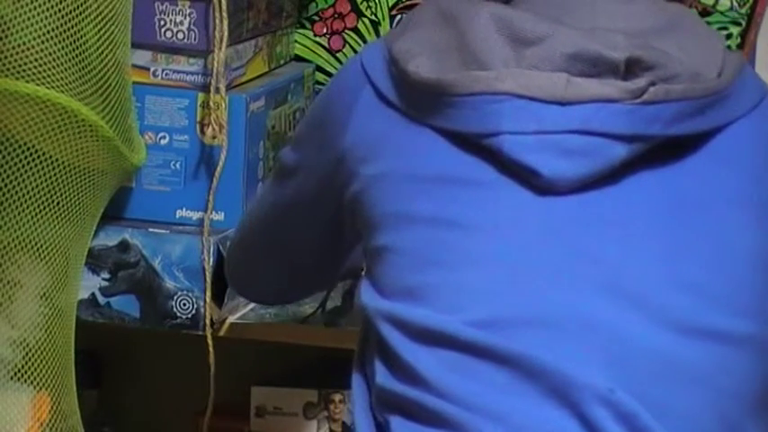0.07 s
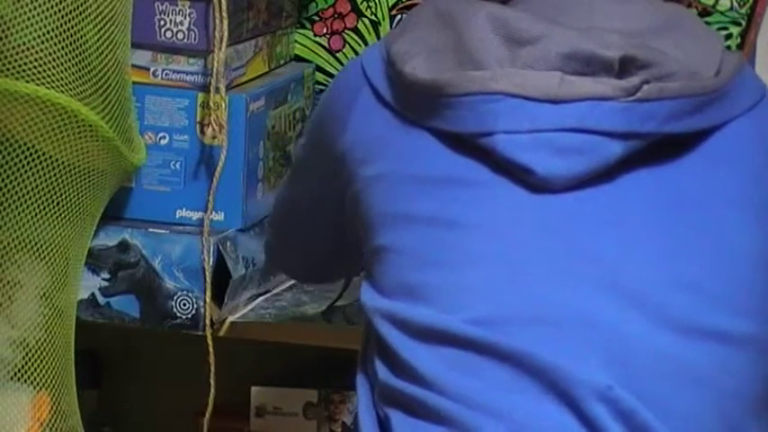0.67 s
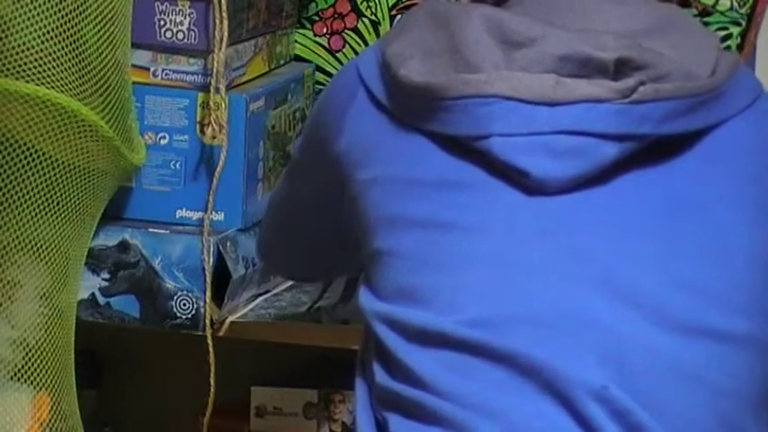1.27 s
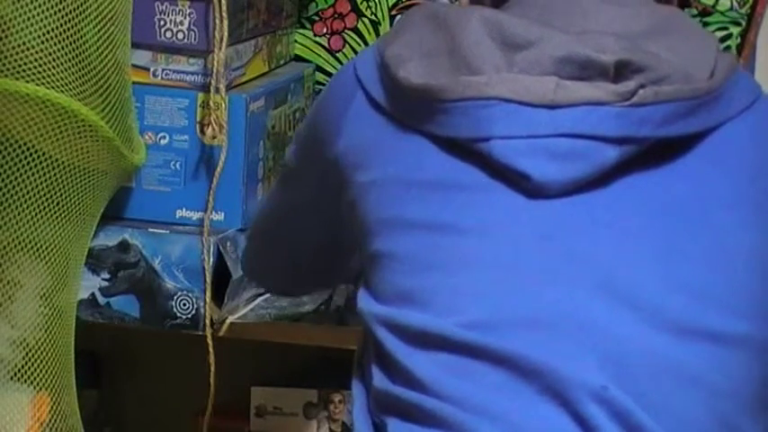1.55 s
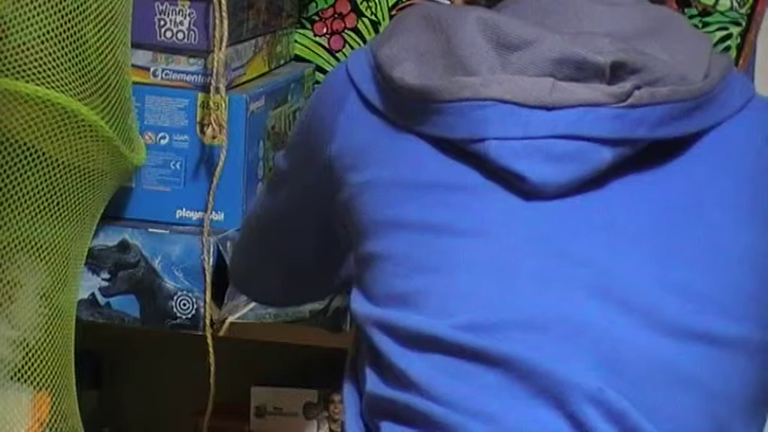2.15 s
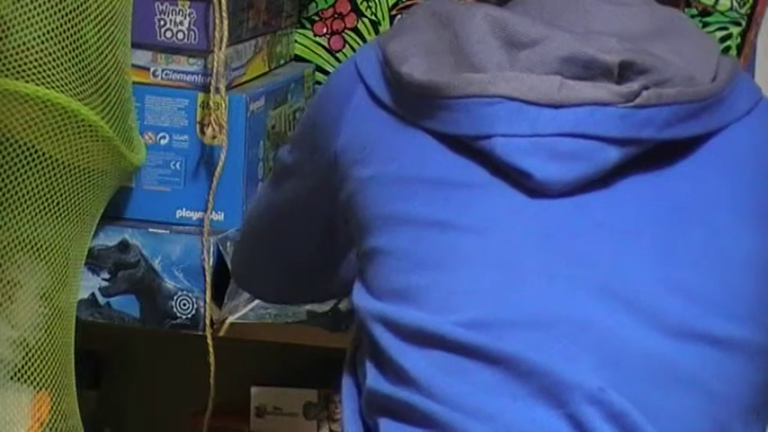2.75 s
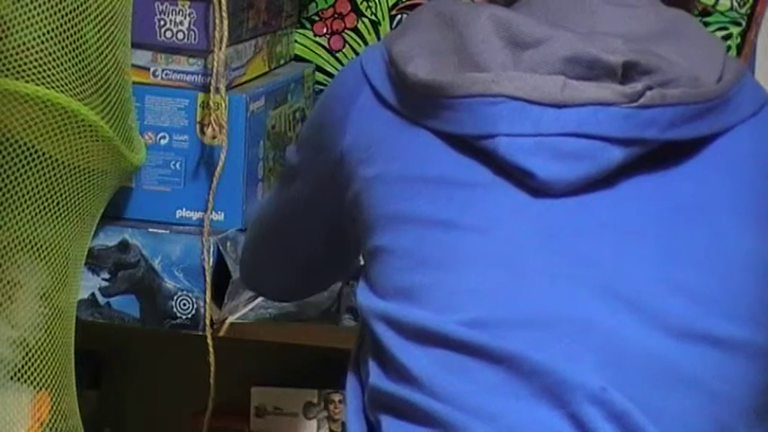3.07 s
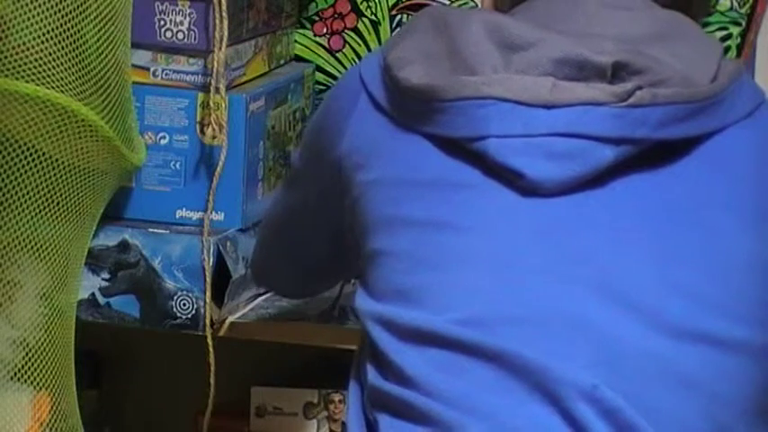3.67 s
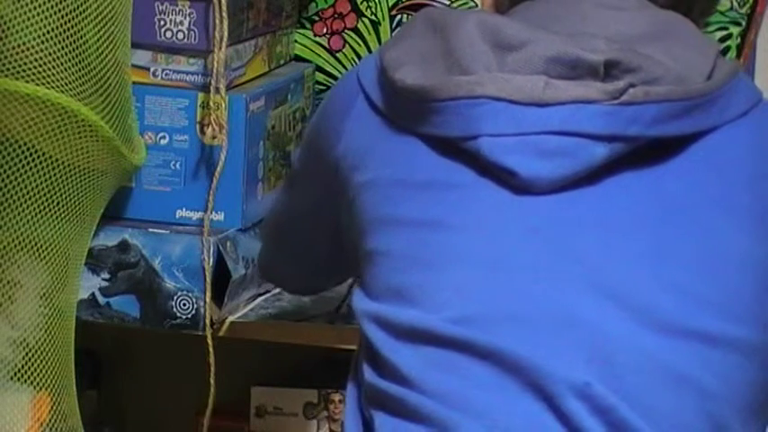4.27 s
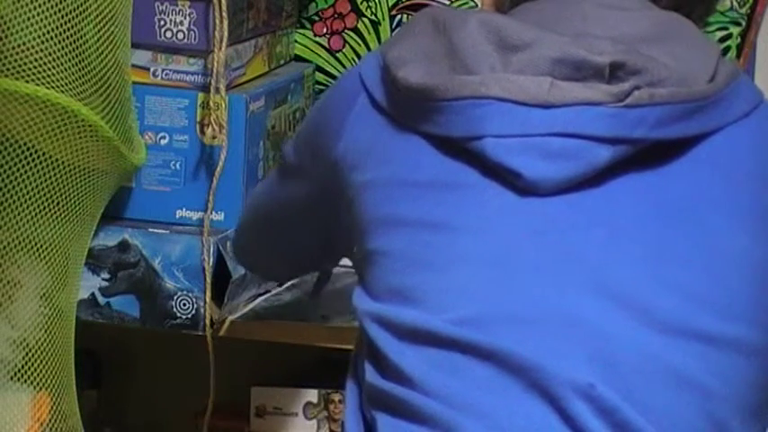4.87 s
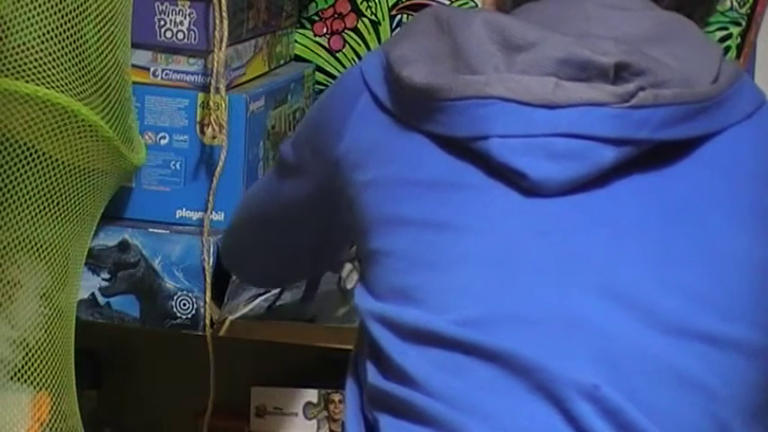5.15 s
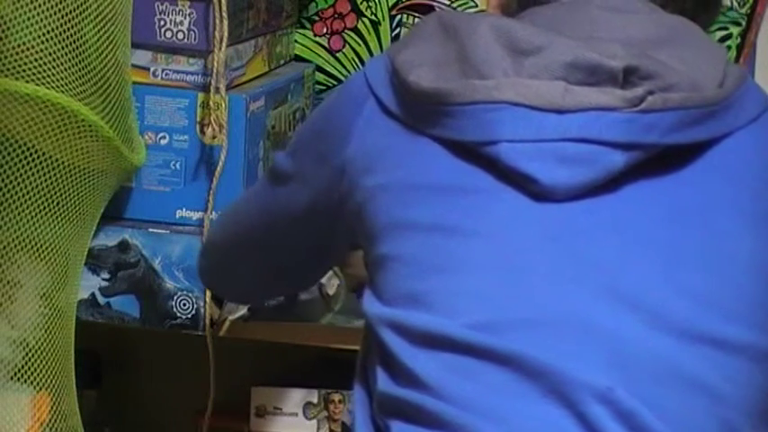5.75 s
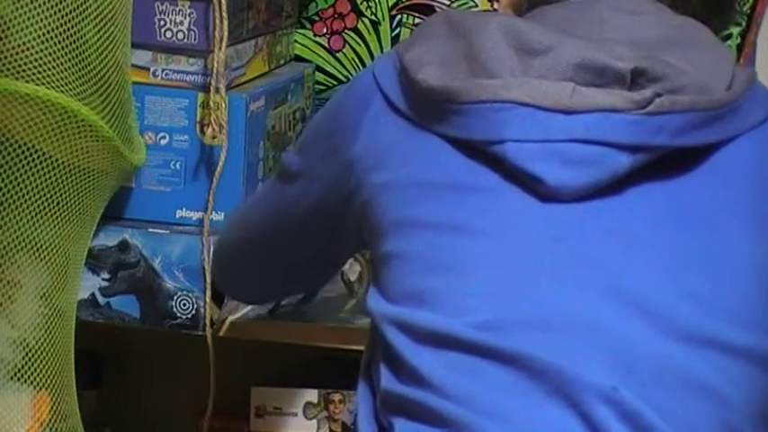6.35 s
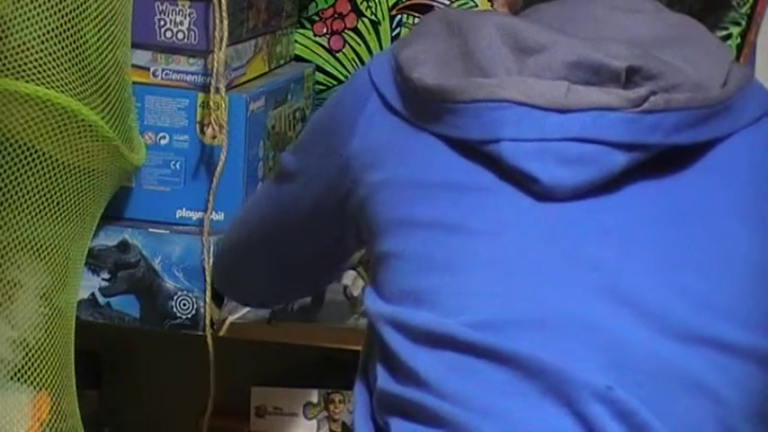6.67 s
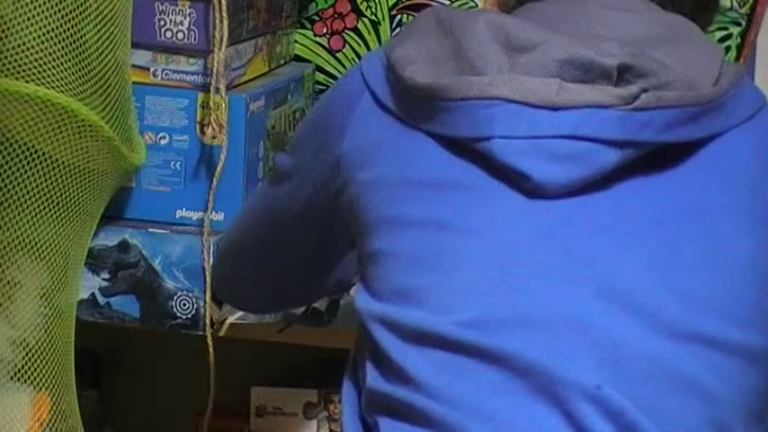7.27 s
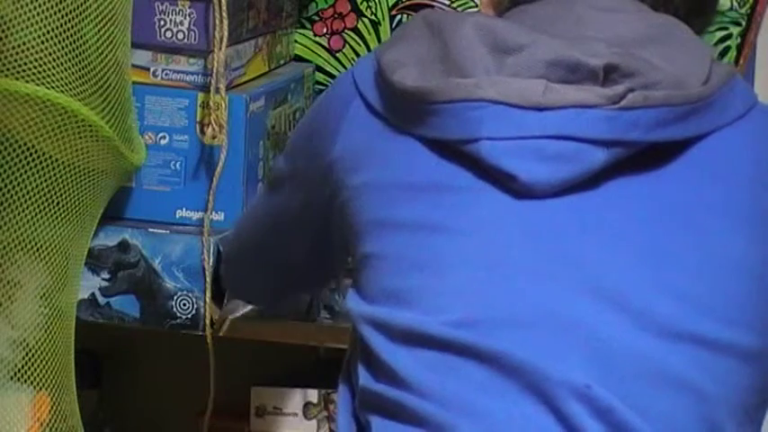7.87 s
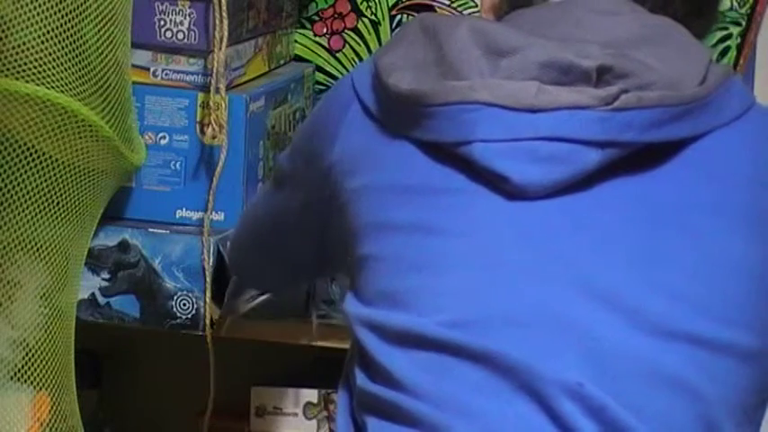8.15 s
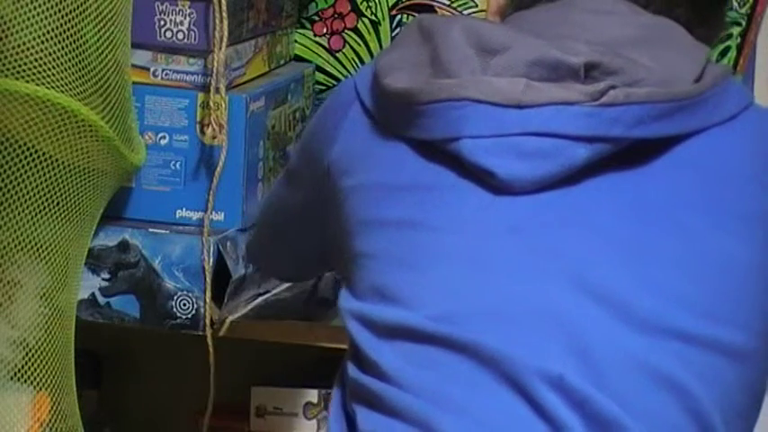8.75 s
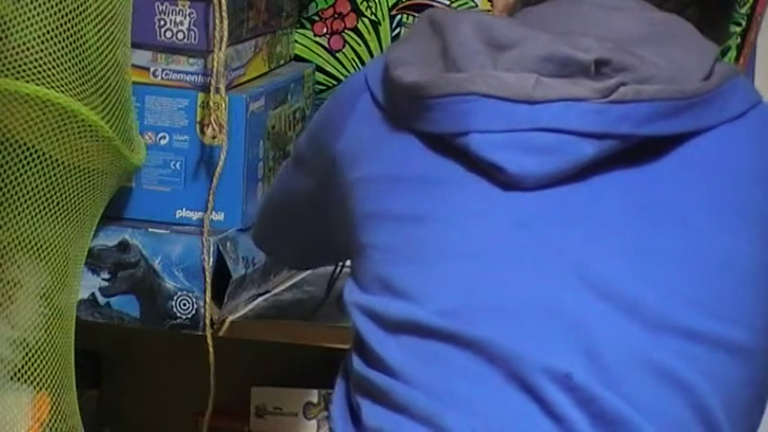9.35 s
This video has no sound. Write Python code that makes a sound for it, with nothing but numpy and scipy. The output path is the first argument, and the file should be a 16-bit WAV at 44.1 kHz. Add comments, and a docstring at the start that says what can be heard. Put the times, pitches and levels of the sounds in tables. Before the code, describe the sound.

Someone rearranges small hard shells on a wooden board, each touch giving a brief ringing click. Sparse, delicate taps build to a short clatter with scraping, thin out, then return as a few bright clacks and hollow knocks near the end. The small room adds a short echo. Cloth rustles softly and a clock ticks faintly over a quiet appliance hum and microphone hiss.

```python
"""In a small, bare-sounding room, seashells are picked up and set down on a wooden shelf.
Each touch makes a shell click and ring at its own pitches. The shells also clack together,
knock on the board and scrape as they slide. Behind them an appliance hums, a clock ticks
faintly once a second and a sleeve rustles as the arm reaches."""
import sys
import numpy as np
from scipy import signal
from scipy.fft import rfft, irfft, next_fast_len
from scipy.io import wavfile
from scipy.ndimage import uniform_filter1d, map_coordinates

SR = 44100
rng = np.random.default_rng(int(sys.argv[2]) if len(sys.argv) > 2 else 0)


def unload_audio(sound):
    """Save the sound as a 16-bit wav file, at the path given as the first command line argument."""
    columns = np.transpose(np.atleast_2d(sound))
    # keep every value between -1 and 1, then stretch to whole-number steps
    steps = np.round(np.clip(columns, -1, 1) * 32767)
    wavfile.write(sys.argv[1], SR, steps.astype(np.int16))


N = 423801
TIME = np.arange(N) / SR
FFT_SIZE = 2 ** 13
HZ = np.fft.rfftfreq(FFT_SIZE, 1 / SR)


def amp(db):
    """Turn decibels into a gain to multiply by."""
    return 10 ** (np.asarray(db) / 20)


def unit(x):
    """Scale a sound to an average power of 1."""
    return x / np.sqrt(np.mean(x ** 2) + 1e-20)


def along(points, hz):
    """Read between (frequency [Hz], value) points on a log frequency scale."""
    freqs, values = np.transpose(points)
    return np.interp(np.log(hz + 1), np.log(freqs + 1), values)


def resonances(modes, hz):
    """Gain of an object that rings at (pitch [Hz], width [Hz], level [dB]); narrow rings last longer."""
    return np.sqrt(sum((amp(db) * hz * width) ** 2 / ((pitch ** 2 - hz ** 2) ** 2 + (hz * width) ** 2)
                       for pitch, width, db in modes))


def filtered(x, gain):
    """Turn each frequency of x up or down by gain(hz)."""
    n = x.shape[-1]
    padded = next_fast_len(n + 8192)
    return irfft(rfft(x, padded) * gain(np.fft.rfftfreq(padded, 1 / SR)), padded)[..., :n]


def impulse(gain):
    """The sound of one instant tap on an object with this gain at each frequency in HZ."""
    cepstrum = irfft(np.log(np.maximum(gain, gain.max() * 1e-6)))
    cepstrum[1:FFT_SIZE // 2] *= 2  # folding this in half puts the energy as early as possible
    cepstrum[FFT_SIZE // 2 + 1:] = 0
    return irfft(np.exp(rfft(cepstrum)))[:FFT_SIZE // 2]


def add(out, time, sound):
    """Mix a sound into out, starting at a time in seconds."""
    start = max(round(time * SR), 0)
    out[:, start:start + sound.shape[1]] += sound[:, :N - start]


# how wide the sound is: (frequency [Hz], side level over middle [dB])
STEREO_WIDTH = [(60, 0), (130, -22), (250, -19), (500, -12.5), (2000, -13), (4000, -9), (8000, -3.5),
                (14000, -1.5)]
def diffuse(n):
    """Stereo noise arriving from all around."""
    mid, side = rng.standard_normal((2, n))
    side = filtered(side, lambda hz: amp(along(STEREO_WIDTH, hz)))
    return np.array([mid + side, mid - side])


def noise(colour):
    """Steady noise of power 1, shaped by (frequency [Hz], level [dB]) points."""
    return unit(filtered(diffuse(N), lambda hz: amp(along(colour, hz))))


# how long the room echoes: (frequency [Hz], time to fade by 60 dB [s])
ROOM_FADE = [(150, 0.21), (400, 0.41), (1000, 0.24), (3000, 0.26), (8000, 0.25), (14000, 0.18)]
# the shelf's walls and the floor bunch the first echoes: (delay [s], boost [dB])
EARLY_ECHOES = [(0, -3), (.0012, 2), (.003, -2.5), (.0047, 3.5), (.007, -0.5), (.0105, -2), (.014, 0),
                (.03, 0.5)]
def in_room(sound, direct=0.11):
    """A sound arrives weakly by the straight path, then as a fresh random set of fading echoes."""
    hz, t, spectrum = signal.stft(diffuse(SR // 3), SR, nperseg=256)
    fade = amp(-60 * t / along(ROOM_FADE, hz)[:, None])
    tail = signal.istft(spectrum * fade, SR, nperseg=256)[1]
    tail *= amp(np.interp(TIME[:tail.shape[1]], *np.transpose(EARLY_ECHOES)))
    path = tail / np.linalg.norm(tail.mean(axis=0))
    path[:, 0] += direct
    return signal.fftconvolve(path, sound[None], axes=1)


# tone of the room's noise: (frequency [Hz], relative level [dB])
AIR_COLOUR = [(25, -24), (40, -6.5), (55, -1), (85, -1.5), (150, -8.5), (195, -5), (255, -22), (305, -3),
              (350, -27), (570, -4.5), (800, -13), (2700, -13.5), (6000, -22.5), (15600, -37.5)]
def room_air(level_db=-62):
    """The room's faint, steady rush."""
    return amp(level_db) * noise(AIR_COLOUR)


# the appliance's tones: (pitch [Hz], width of the wander [Hz], level [dB])
HUM_TONES = [(59.5, 7.2, -77.5), (199, 1.98, -65.5), (564, 6.5, -78.5), (2166, 31.3, -72.5),
             (2270, 11, -92)]
def appliance(drone_hz=64.6, drone_db=-64.5, drone_start_s=7.45, drone_rise_s=0.91):
    """An appliance hums in slightly wandering tones; a low drone joins near the end."""
    def tone(hz, width):
        drift = np.cumsum(rng.standard_normal(N)) * np.sqrt(np.pi * width / SR)
        return np.sqrt(2) * np.sin(2 * np.pi * hz * TIME + uniform_filter1d(drift, size=600))
    hum = sum(amp(db) * tone(hz, width) for hz, width, db in HUM_TONES)
    fade_in = np.clip((TIME - drone_start_s) / drone_rise_s, 0, 1)
    return hum + amp(drone_db) * fade_in * tone(drone_hz, 0.8)


def clock(tick_db=-25, period_s=.998, rebound_s=.018, rebound_db=-3):
    """The clock's hand steps and settles, sounding its hollow case."""
    out = np.zeros((2, N))
    case = impulse(resonances([(848, 184, -10), (1890, 1450, -17)], HZ) ** 2)
    case = amp(tick_db) * case / np.linalg.norm(case)
    for time in np.arange(.184, 9.5, period_s):
        tick = in_room(case)
        add(out, time, tick)
        add(out, time + rebound_s, amp(rebound_db) * tick)
    return out


# tone of rubbing cloth: (frequency [Hz], relative level [dB])
CLOTH_COLOUR = [(100, -37), (200, 3), (400, 8), (800, 3), (2000, 1), (4000, -13), (9000, -11.5),
                (12000, -20.5), (15000, -59)]
# the arm reaches out: (middle time [s], length [s], rise [dB])
ARM_REACHES = [(0.047, 1.1, 7), (.85, 0.93, 7.5), (2.8, 2.2, 3), (4.802, 2, 4.5), (6.038, 0.3, 6),
               (6.902, 0.95, 4), (8.702, 2.1, 4)]
def sleeve(resting_db=-66, flutter_db=1, flutter_hz=22):
    """Cloth rubs unevenly, swelling and sinking with each reach of the arm."""
    flutter = map_coordinates(rng.standard_normal(1000), [TIME * flutter_hz], order=1, mode="wrap")
    swell_db = sum(db * np.cos(np.pi * np.clip((TIME - middle) / length, -.5, .5)) ** 2
                   for middle, length, db in ARM_REACHES)
    return amp(resting_db + swell_db + flutter_db * flutter) * noise(CLOTH_COLOUR)


# tone of the wood: (frequency [Hz], relative level [dB])
BOARD_COLOUR = [(30, -44), (100, -6), (135, -11), (175, -2), (240, -5.5), (320, -2.5), (430, -3.5),
                (480, -10), (570, -1.5), (850, 0.5), (2400, -5), (2900, -12), (8000, -40), (12000, -47.5),
                (15000, -75)]
# where the wood rings: (pitch [Hz], width [Hz], relative level [dB])
BOARD_RINGS = [(203, 12.5, 12.5), (559.6, 10, 3.5), (823, 40, 5), (904, 15, 7.5), (960, 12, -6),
               (1218, 63, 5), (1545.5, 27, 12.5), (1990, 90, 0.5), (2470, 61, 6)]
def board():
    """Gain of the shelf board: a broad wooden knock with a few ringing pitches on top."""
    return amp(along(BOARD_COLOUR, HZ)) * np.hypot(1, resonances(BOARD_RINGS, HZ))


# tone of a hard contact: (frequency [Hz], relative level [dB])
CLICK_COLOUR = [(60, -20), (130, -22), (195, 4.5), (240, -9), (340, -4.5), (480, -6.5), (600, 3.5),
                (2500, 12), (5500, 7.5), (8500, 9), (10500, 2.5), (12500, -7), (14000, -24), (16000, -42)]
def click(ring=0):
    """Gain of a hard contact, with any ringing laid on top."""
    return amp(along(CLICK_COLOUR, HZ)) * np.hypot(1, ring)


# borders of the five bands called thud, knock, clack, ting and sparkle: (frequency [Hz])
BAND_EDGES = [120, 500, 1400, 3000, 5500, 14000]
def strike(body, levels_db):
    """One blow: where and how hard it lands sets how loud each of the five bands is."""
    edges = np.array(BAND_EDGES)
    centres = np.sqrt(edges[:-1] * edges[1:])
    bands = [(HZ >= low) & (HZ < high) for low, high in zip(edges, edges[1:])]
    for _ in range(3):  # reshape the tone smoothly, bringing each band closer to its level
        power = [2 * np.sum(body[band] ** 2) / FFT_SIZE for band in bands]
        boost_db = levels_db - 10 * np.log10(power)
        body = body * amp(along(np.column_stack([centres, boost_db]), HZ))
    return in_room(impulse(body))


def brighten(hardness_db):
    """A harder contact is shorter: it lifts the sparkle and lowers each band below the ting."""
    return hardness_db * np.arange(-3, 2)


def fidgets(count=18, typical_s=0.065, level_db=-67.5, spread_db=6):
    """Rows for slides(): faint, scattered finger scrapes, each at a lower pitch of some shell."""
    pitches = [hz for low, middle, *_ in SHELL_KINDS.values() for hz in (low, middle)]
    rows = []
    for k, (when, length, force, pick) in enumerate(rng.random((count, 4))):
        time = (k + when) / count * N / SR
        db = level_db + spread_db * (2 * force - 1)
        rows.append((time, typical_s * (.5 + length), db, db, pitches[int(pick * len(pitches))]))
    return rows


# a shell is dragged or rocked: (time [s], length [s], rumble [dB], scratch [dB], pitch [Hz])
SHELL_SLIDES = [(.03, 0.09, -53, -58.5, 1950), (.165, 0.023, -55, -62, 3750), (.54, 0.085, -77, -57, 1970),
                (.81, 0.066, -62, -64, 9100), (.96, 0.065, -59.5, -66, 2000),
                (1.12, 0.082, -51.5, -55.5, 1900), (1.8, 0.027, -60, -74, 2000),
                (2.97, 0.042, -73, -60, 4040), (3.175, 0.019, -74, -51, 6100), (3.65, .069, -69, -50, 6200),
                (4.112, .018, -48, -38, 7750), (4.257, 0.055, -46.5, -58, 3730),
                (4.421, 0.35, -58.5, -82, 1530), (4.84, .11, -57, -61.5, 8100),
                (5.04, 0.051, -75, -59.5, 8800), (5.27, 0.32, -64.5, -67, 7900),
                (6.59, 0.1, -59, -53, 3840), (6.86, 0.093, -62, -68, 1500), (7.14, .016, -78, -63, 9100),
                (9.3, 0.042, -52, -56, 2300)]
def slides(uneven_db=5, ring_db=15, width_hz=260):
    """A dragged shell catches in many tiny slips that shake both the board and the shell."""
    out = np.zeros((2, N))
    rumble = impulse(board() * amp(along([(100, 0), (200, 6), (400, 3), (2000, -10)], HZ)))
    rumble /= np.linalg.norm(rumble)
    for time, length, rumble_db, scratch_db, pitch in list(SHELL_SLIDES) + fidgets():
        n = int(length * SR)
        push, slip_size = rng.standard_normal((2, SR // 2))[:, :n]
        slips = unit(push * amp(uneven_db * slip_size) * np.sin(np.pi * np.arange(n) / n))
        scratch = impulse(click(resonances([(pitch, width_hz, ring_db)], HZ)))
        body = amp(rumble_db) * rumble + amp(scratch_db) * scratch / np.linalg.norm(scratch)
        add(out, time, in_room(signal.fftconvolve(slips, body)))
    return out


# a nudged shell taps its neighbour: (time [s], level before gain [dB])
SHELL_TAPS = [(1.529, -52.5), (2.893, -56.5), (3.016, -48), (3.957, -51), (4.514, -48), (5.253, -48.5),
              (6.03, -59)]
# tone of a tap, from thud to sparkle: (relative level [dB])
TAP_BANDS = [-21.5, -16.5, -1.5, -11.5, -16]
def taps(gain_db=30, pitch_hz=2050, width_hz=220, ring_db=12):
    """A soft nudge clicks and rings only a shell's lowest pitch."""
    out = np.zeros((2, N))
    body = click(resonances([(pitch_hz, width_hz, ring_db)], HZ))
    for time, db in SHELL_TAPS:
        add(out, time, strike(body, db + np.array(TAP_BANDS)))
    return amp(gain_db) * out


# the heap of shells rings along with knocks and clinks: (pitch [Hz], width [Hz], relative level [dB])
HEAP_RINGS = [(1840, 230, -9), (4103, 58, -4.5), (6300, 180, -15.5), (7730, 150, -2), (9110, 150, -2.5),
              (10080, 500, -11.5), (12100, 490, -8.5)]
# a shell lands on the board: (time [s], level before gain [dB], hardness [dB])
BOARD_KNOCKS = [(.898, -44.5, -2.5), (2.767, -58.5, 5.5), (4.096, -31, 4.5), (4.108, -40, 7.5),
                (4.371, -48, 5), (4.413, -46, -9.5), (4.527, -50, 3.5), (4.645, -51, -5), (4.943, -49.5, 3),
                (5.197, -47, -7.5), (5.461, -51, -7.5), (5.54, -37.5, 9), (8.416, -21.5, -3.5),
                (9.425, -30, 4)]
# tone of a soft knock, from thud to sparkle: (relative level [dB])
KNOCK_BANDS = [-6, 0, 0, -17, -24]
# what hardness adds to each of those bands: (boost [dB per dB of hardness])
HARDNESS_SHARE = [-0.098, 0.035, 0.81, 0.99, 0.35]
def knocks(gain_db=30, ring_db=7):
    """A shell is set down: the board answers and the heap rings a little; a hard edge adds treble."""
    out = np.zeros((2, N))
    body = board() * np.hypot(1, amp(ring_db) * resonances(HEAP_RINGS, HZ))
    for time, db, hardness_db in BOARD_KNOCKS:
        levels_db = db + np.array(KNOCK_BANDS) + hardness_db * np.array(HARDNESS_SHARE)
        add(out, time, strike(body, levels_db))
    return amp(gain_db) * out


# how two shells ring when pressed together: (pitch [Hz], width [Hz], relative level [dB])
PAIR_RINGS = [(2250, 600, 8), (2700, 380, 2.5), (3370, 200, -13.5), (4670, 840, -6), (6300, 320, 5),
              (7640, 520, 7), (9350, 520, 6), (10470, 870, 9.5), (12400, 830, 10)]
# shell hits shell: (time [s], level before gain [dB], hardness [dB per band], low pitch [Hz])
SHELL_CLACKS = [(7.771, -48.5, -7.5, 2620), (7.806, -30.5, 1, 2774), (7.923, -36, -2, 3380),
                (7.934, -32.5, 0.5, 3430), (8.103, -57.5, -1.5, 2380)]
# tone of a clack, from thud to sparkle: (relative level [dB])
CLACK_BANDS = [-43, -26, -0.5, -0.5, 0.5]
def clacks(gain_db=30, width_hz=110, ring_db=13, pitch_ratio=1.763):
    """Two shells collide and bounce; the hand cuts their ringing short."""
    out = np.zeros((2, N))
    for time, db, hardness_db, low_hz in SHELL_CLACKS:
        own_rings = [(low_hz, width_hz, ring_db), (pitch_ratio * low_hz, width_hz, ring_db)]
        body = click() * resonances(own_rings + list(PAIR_RINGS), HZ)
        levels_db = db + np.array(CLACK_BANDS) + brighten(hardness_db)
        add(out, time, strike(body, levels_db))
    return amp(gain_db) * out


# each shell by name: (low pitch [Hz], middle pitch [Hz], high pitch [Hz],
# width of the lower two [Hz], ring over click [dB], extra ting [dB])
SHELL_KINDS = {"light": (1930, 3700, 9000, 150, 12, 1.5), "plain": (1928, 3690, 7780, 150, 16.5, -2),
               "ribbed": (1600, 5260, 7000, 490, 32, 3.8), "flat": (1920, 4050, 8150, 240, 11.2, 3.9),
               "thin": (2060, 6270, 7820, 110, 15, -2), "tiny": (5270, 6140, 7668, 520, 23, 0.5),
               "round": (2380, 4100, 8200, 180, 22, 2), "thick": (2900, 4300, 7720, 840, 23, 2.1)}
# ringing touches: (time [s], shell name, level before gain [dB], hardness [dB per band],
# jolt of the board before gain [dB])
SHELL_CLINKS = [(.193, "light", -44.5, -1.7, -52.5), (.691, "light", -56.5, -7.5, -69),
                (1.558, "plain", -46, 1, -68), (1.69, "ribbed", -45, 2.5, -67),
                (2.376, "flat", -47, -6, -51.5), (2.703, "light", -52.5, -1, -64),
                (3.249, "thin", -40.5, 0.5, -68), (3.508, "tiny", -37.5, 11, -66),
                (4.133, "round", -30.5, 3, -42.5), (4.196, "plain", -33.5, 0.5, -40),
                (4.222, "plain", -42.5, 5, -51), (5.54, "thick", -32.5, -5, -44.5),
                (5.884, "flat", -61.5, 8.5, -59), (6.642, "plain", -51.5, 1.5, -70),
                (6.813, "thin", -61, -4.5, -56), (7.027, "flat", -57.5, -3, -63),
                (7.361, "flat", -53, 4, -61), (8.944, "thin", -37.5, 3.5, -43),
                (9.279, "thin", -49, 0, -58)]
def clinks(gain_db=30, high_width_hz=90, low_db=-3, high_db=3, thud_db=-3):
    """A touched shell clicks, rings at three pitches, stirs the heap and jolts the board."""
    out = np.zeros((2, N))
    for time, shell, db, hardness_db, jolt_db in SHELL_CLINKS:
        low, middle, high, width, ring_db, ting_db = SHELL_KINDS[shell]
        # fingers muffle the two lower pitches, so those are wider and die sooner
        own_rings = [(low, width, low_db), (middle, width, 0), (high, high_width_hz, high_db)]
        ring = amp(ring_db) * resonances(own_rings + list(HEAP_RINGS), HZ)
        levels_db = db + brighten(hardness_db) + np.array([0, 0, 0, ting_db, 0])
        levels_db[:2] = jolt_db + thud_db, jolt_db  # the two lowest bands come from the board
        add(out, time, strike(click(ring), levels_db))
    return amp(gain_db) * out


def scene(pan_db=.5):
    """The shells and the sounds behind them, all a little right of centre."""
    shells = clinks() + clacks() + knocks() + taps() + slides()
    background = clock() + sleeve() + appliance() + room_air()
    return (shells + background) * amp([[-pan_db], [pan_db]])


# tone of the microphones' own noise: (frequency [Hz], relative level [dB])
HISS_COLOUR = [(25, -20), (60, -10), (150, 4), (450, 2), (1000, -3), (2000, -9.5), (4000, -18),
               (8000, -28.5), (15000, -42)]
def record(dry, hiss_db=-57.5, top_hz=15750):
    """Stereo widening lifts microphone hiss, opposite in left and right; the top treble is cut off."""
    hiss = unit(filtered(rng.standard_normal(N), lambda hz: amp(along(HISS_COLOUR, hz))))
    return filtered(dry + amp(hiss_db) * np.array([hiss, -hiss]), lambda hz: hz < top_hz)


dry = scene()
out = record(dry)
unload_audio(out)
```